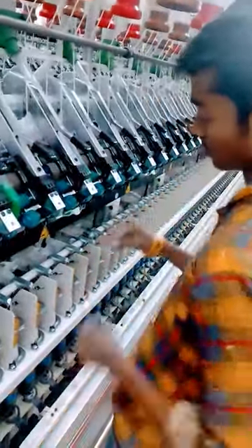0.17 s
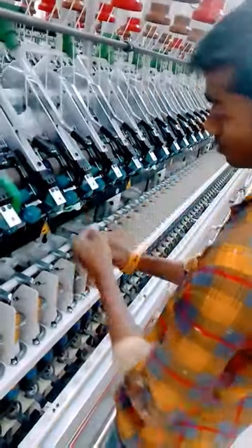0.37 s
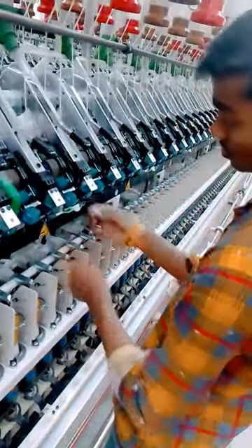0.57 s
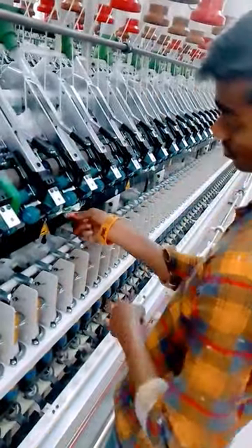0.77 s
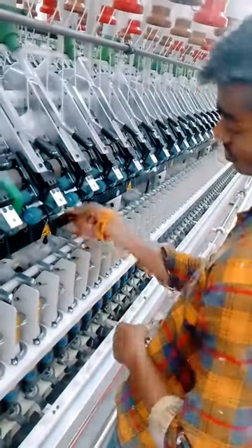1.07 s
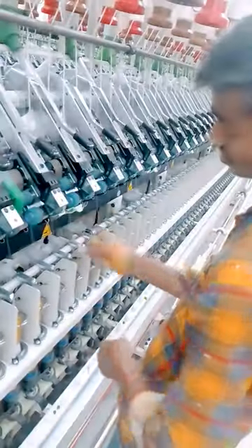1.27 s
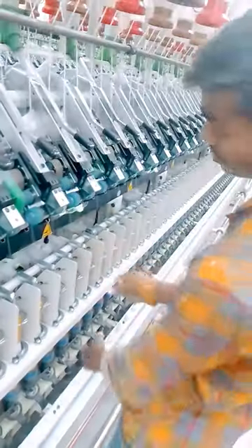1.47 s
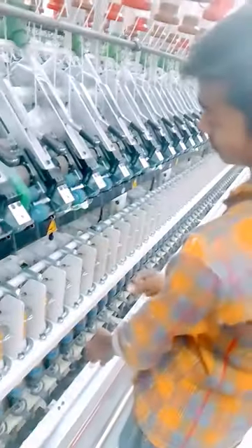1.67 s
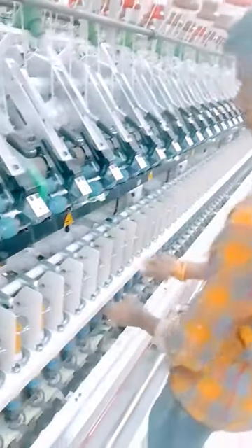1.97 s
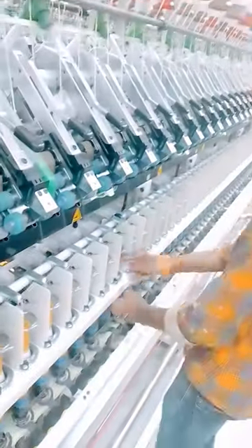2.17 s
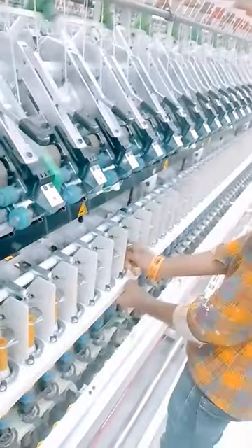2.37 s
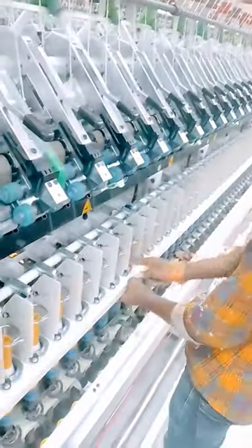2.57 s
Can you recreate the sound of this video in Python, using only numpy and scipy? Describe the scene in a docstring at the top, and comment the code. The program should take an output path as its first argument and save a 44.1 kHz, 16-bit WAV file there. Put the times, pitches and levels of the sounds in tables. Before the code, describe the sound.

Spinning frame roaring at full speed in a mill, its many spindles humming, beating and sizzling

```python
"""Spinning frame at full speed

A ring spinning frame runs in a textile mill, heard from the aisle beside the spindles.
Spindle groups at slightly different speeds hum and beat, each a sine under a ladder of flickering overtones.
Shaped noise makes the travellers' roar and hiss, a comb of noise lines the sizzle of the nearest spindle.
Narrow noise bands ring in the frame, and short decaying sines patter as chinks."""
import sys
import numpy as np
from scipy import signal
from scipy.fft import rfft, irfft, next_fast_len
from scipy.io import wavfile
from scipy.ndimage import uniform_filter1d, minimum_filter1d

SR = 44100
rng = np.random.default_rng(int(sys.argv[2]) if len(sys.argv) > 2 else 0)


def master_out(mix):
    """Clip the mix to full scale and print it as 16-bit PCM to the path in sys.argv[1]."""
    frames = np.transpose(np.atleast_2d(mix))
    ceiling = np.clip(frames, -1, 1)
    pcm = np.round(ceiling * 32767).astype(np.int16)
    wavfile.write(sys.argv[1], SR, pcm)


N = 120393  # length in samples
OVERTONE_FLICKER_DB = 4.5


def undb(db):
    """Decibels to gain."""
    return 10 ** (np.asarray(db) / 20)


def curve(rows):
    """Straight lines in time through (start_s, value) rows."""
    times, values = np.array(rows, float).T
    return np.interp(np.arange(N) / SR, times, values)


def db_at(hz, rows):
    """Level read from (pitch_hz, level_db) rows on a log-frequency axis."""
    row_hz, row_db = np.array(rows, float).T
    return np.interp(np.log(np.maximum(hz, 1)), np.log(row_hz), row_db)


def noise(gain):
    """Noise of rms 1 whose spectrum follows gain(hz)."""
    size = next_fast_len(N)
    hz = np.arange(size // 2 + 1) * SR / size
    spectrum = rfft(rng.standard_normal(size)) * gain(hz)
    shaped = irfft(spectrum, size)[:N]
    return shaped / shaped.std()


def walk(rate_hz):
    """Smooth random drift around zero, of spread about 1, heading for rate_hz new values a second."""
    steps = np.arange(N) / SR * rate_hz + rng.random()
    drift = np.interp(steps, np.arange(512), rng.standard_normal(512))
    return uniform_filter1d(drift, int(SR / rate_hz / 2)) * np.sqrt(2)


def shaft(hz, waver_share):
    """Angle of a spindle (radians) whose speed wavers a little."""
    speed = hz * (1 + waver_share * walk(10))
    return 2 * np.pi * np.cumsum(speed) / SR


def tone(angle, db):
    """A sine at the given rms level, from a random phase."""
    return np.sqrt(2) * undb(db) * np.sin(angle + 2 * np.pi * rng.random())


def overtones(angle, hz, rows):
    """Multiples 2 to 14 of a spindle's turn, each flickering in level on its own."""
    ladder = 0
    for k in range(2, 15):
        flicker_db = OVERTONE_FLICKER_DB * (walk(7.02) - .5)
        ladder = ladder + tone(k * angle, db_at(k * hz, rows) + flicker_db)
    return ladder


def resonance(centre_hz, width_hz):
    """One narrow resonance: noise of rms 1, its gain halved at the edges of the width."""
    return noise(lambda hz: 1 / (1 + ((hz - centre_hz) / (width_hz / 2)) ** 2))


def frame():
    """Narrow resonances of the frame, shaken by the drive, and a whine that comes and goes."""
    # ringing of frame and drive: centre_hz, width_hz, level_db
    rings = [(229.3, 11, -37.5), (345, 28, -34), (450.6, 8.5, -38), (560, 28, -37), (777, 10, -38),
             (1386, 40, -34)]
    # swell of the whine: start_s, level_db
    whine_level = [(0, -34), (.2, -31), (.36, -26), (.5, -35), (.7, -29), (.9, -33), (1.17, -21),
                   (1.3, -26), (1.5, -30), (1.76, -24), (1.95, -31), (2.1, -37), (2.22, -28), (2.4, -27.5),
                   (2.73, -30)]
    ringing = sum(undb(db) * resonance(hz, width_hz) for hz, width_hz, db in rings)
    whine = undb(curve(whine_level)) * resonance(1090.4, 24)
    return ringing + whine


def other_spindles():
    """Slower groups: their hums merge into one throbbing drone under their overtones."""
    # spindle groups: turns_hz, relative hum_db, overtones_db, waver of the overtones' speed (share)
    groups = [(274.6, 0, -34.5, 0.00123), (279.4, 0, -23.5, .0012), (286.2, -1, -30, 0.00212),
              (270.6, -8.5, -29, 0.00299)]
    # colour of their overtones: pitch_hz, relative level_db
    group_colour = [(550, -4), (830, -3), (1100, 1), (1400, -2.5), (1660, -5), (2000, -7.5), (3000, -10),
                    (4100, -6.5), (5000, -22)]
    # throb of the joint hum as the groups beat, before a lift: start_s, level_db
    throb = [(0.0, -37), (0.03, -16.5), (0.07, -16.5), (0.1, -27.5), (0.27, -19), (0.33, -33),
             (0.36, -18.5), (0.49, -25), (0.61, -17.5), (0.67, -33), (0.74, -18.5), (0.8, -26), (0.84, -18),
             (0.96, -21.5), (0.99, -26), (1.04, -18), (1.19, -29), (1.26, -16), (1.31, -31), (1.42, -27),
             (1.6, -25.5), (1.63, -16.5), (1.76, -28.5), (1.88, -16.5), (1.93, -27), (2.14, -19.5),
             (2.28, -24.5), (2.34, -18.5), (2.53, -27.5), (2.56, -16.5), (2.65, -30), (2.73, -22)]
    throb_lift_db = 1.5
    hum_waver_share, depth_floor = 0.00215, 0.52

    hum, ladders = 0, 0
    for hz, hum_db, overtone_db, waver_share in groups:
        ladder = overtones(shaft(hz, waver_share), hz, group_colour)
        ladders = ladders + undb(overtone_db) * ladder / ladder.std()
        phase = shaft(hz, hum_waver_share) + 2 * np.pi * rng.random()
        hum = hum + undb(hum_db) * np.exp(1j * phase)
    # even out the swell of the beats, so that the throb curve leads
    drone = np.sqrt(2) * hum.real / np.hypot(abs(hum), depth_floor)
    return drone * undb(curve(throb) + throb_lift_db) + ladders


def chinks():
    """Travellers chink on their rings: a dense patter of short decaying sines at random pitches."""
    chinks_per_s, t60_s, attack_s = 260, 0.12, 0.002
    low_hz, high_hz = 999.6, 4408
    scatter_db, patter_db = 3.5, -20.5

    t = np.arange(SR // 6) / SR
    envelope = np.exp(-np.log(1000) * t / t60_s) * (1 - np.exp(-t / attack_s))
    # room for one ring ahead of the start and one past the end; the count is for the heard length
    patter = np.zeros(N + 2 * len(t))
    for when, pitch, size in rng.random((int(chinks_per_s * N / SR), 3)):
        hz = low_hz + pitch * (high_hz - low_hz)
        start = int(when * (N + len(t)))
        # most chinks are soft, a few stand out
        loudness = undb(scatter_db * min(-np.log(1 - size), 3))
        patter[start:start + len(t)] += loudness * envelope * np.sin(2 * np.pi * hz * t)
    patter = patter[len(t):len(t) + N]
    return undb(patter_db) * patter / patter.std()


def fluttering(rows):
    """Noise of rms 1 with the spectrum of a table, whose octaves flutter separately."""
    # centres of the overlapping bands: pitch_hz
    octaves = [60, 250, 500, 1000, 2000, 4000, 8000, 16000]
    flutter_db, flutter_hz = 0.42, 23.83

    size = next_fast_len(N)
    hz = np.arange(size // 2 + 1) * SR / size
    spectrum = rfft(rng.standard_normal(size)) * undb(db_at(hz, rows))
    total = 0
    for band in np.eye(len(octaves)):
        # each band fades linearly into its neighbours
        part = irfft(spectrum * np.interp(hz, octaves, band), size)[:N]
        total = total + part * undb(flutter_db * walk(flutter_hz))
    return total / total.std()


def sizzle_comb(hz):
    """The nearest spindle sizzles once a turn: blurred spectral lines at multiples of its speed."""
    # colour of the sizzle: pitch_hz, relative level_db
    sizzle_colour = [(3000, -22), (5700, 4), (6600, -2), (7200, -5), (8500, -8), (9600, -9), (12300, -11),
                     (13300, -7), (14140, -6), (14440, 6), (14740, -2), (15400, -4)]
    turns_hz, spread_share = 300.9, 0.00077
    multiple = np.maximum(np.round(hz / turns_hz), 1) * turns_hz
    blur = 1 / (1 + ((hz / multiple - 1) / (2 * spread_share)) ** 2)
    return undb(db_at(hz, sizzle_colour)) * blur


def travellers():
    """Roar of hundreds of ring travellers, belts and air, hiss of the close ones, sizzle of the nearest."""
    # colour of the roar: pitch_hz, relative level_db per Hz
    roar_colour = [(25, -24), (60, -21), (130, -26.5), (190, -12.5), (250, -5.5), (400, -2.5), (520, -4),
                   (680, -7), (900, -3.5), (1200, -4), (1550, 0), (2200, .5), (3200, -1), (3700, -4),
                   (4100, -2.5), (4500, -9.5), (4900, -16.5), (6000, -32.5), (8000, -24), (16000, -48)]
    # colour of the hiss of yarn and travellers close by: pitch_hz, relative level_db per Hz
    hiss_colour = [(1000, -11), (3000, -0.5), (5000, 0.5), (5900, 2), (6500, -0.5), (6900, -6.5),
                   (8000, -15.5), (9800, -9), (12000, -12.5), (13000, -12), (14400, -6), (15500, -7.5)]
    # level swings of hiss and sizzle, which the roar follows in part: start_s, level_db
    treble_swing = [(0, -1.5), (.07, 2), (.17, -.5), (.3, 0), (.59, 0.5), (.66, -.7), (.9, -0.3),
                    (1.33, .5), (1.62, 0), (1.95, -.7), (2.15, 0.5), (2.32, 1), (2.38, -4), (2.44, 1.5),
                    (2.5, 0), (2.55, 2.5), (2.63, -1), (2.7, 1.5)]
    roar_follows = 0.76  # share of the swings
    roar_db, hiss_db, sizzle_db = -12.5, -26.5, -39.5
    roar_flutter_db, hiss_flutter_db = 0.26, 1

    swing_db = curve(treble_swing)
    flutter = walk(31.93)
    roar_level_db = roar_db + roar_follows * swing_db + roar_flutter_db * flutter
    roar = fluttering(roar_colour) * undb(roar_level_db)
    hiss = fluttering(hiss_colour) * undb(hiss_db)
    sizzle = noise(sizzle_comb) * undb(sizzle_db)
    return roar + (hiss + sizzle) * undb(swing_db + hiss_flutter_db * flutter)


def near_spindles():
    """The closest group: a strong unbalance hum, once a turn, and its overtones."""
    # speed before its waver: start_s, turns_hz
    near_speed = [(0, 305), (.87, 305.3), (1.47, 305.3), (2.06, 306), (2.73, 305.9)]
    # hum, changing as the listener moves along the aisle: start_s, level_db
    near_hum = [(0, -35), (.14, -22), (.35, -28), (.55, -22), (.85, -19), (1.05, -19), (1.22, -18),
                (1.32, -22), (1.43, -16), (1.53, -22), (1.75, -18), (1.88, -17.5), (2.08, -15), (2.3, -20),
                (2.44, -29), (2.6, -23), (2.73, -29)]
    # overtones before their flicker: pitch_hz, level_db
    near_colour = [(611, -39.5), (916, -38), (1222, -34), (1527, -29), (1833, -33), (2139, -31.5),
                   (2444, -36), (3055, -44), (4000, -41), (5000, -63)]
    speed = curve(near_speed)
    angle = shaft(speed, 0.00041)
    hum = tone(angle, curve(near_hum))
    return hum + overtones(angle, speed.mean(), near_colour)


def scene():
    """All the machinery, the same in both ears."""
    mono = frame() + other_spindles() + chinks() + travellers() + near_spindles()
    return np.array([mono, mono])


def record(dry):
    """A fast limiter holds the highest peaks, then a steep low-pass cuts the top."""
    ceiling, limiter_s, top_hz = 0.93, 0.0033, 15500
    size = max(int(limiter_s * SR), 3)
    needed = ceiling / np.maximum(abs(dry), ceiling)
    # hold the lowest gain around each peak, then smooth it
    gain = uniform_filter1d(minimum_filter1d(needed, 2 * size), size)
    low_pass = signal.ellip(10, .2, 80, top_hz, fs=SR, output="sos")
    return signal.sosfilt(low_pass, dry * gain)


dry = scene()
out = record(dry)
master_out(out)
```